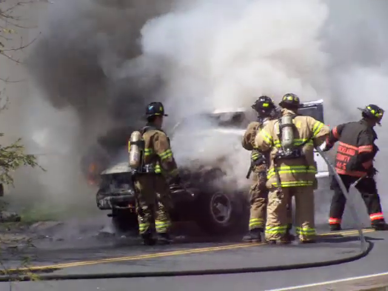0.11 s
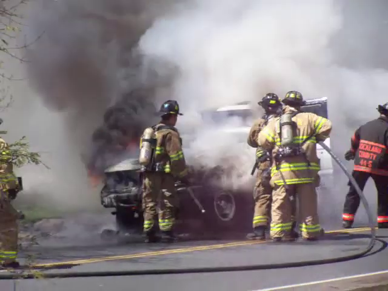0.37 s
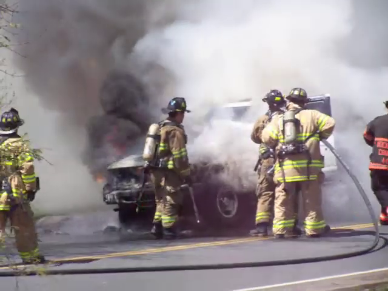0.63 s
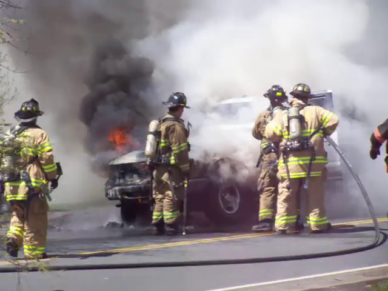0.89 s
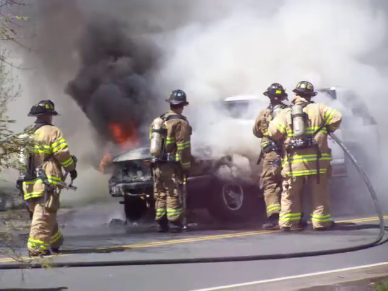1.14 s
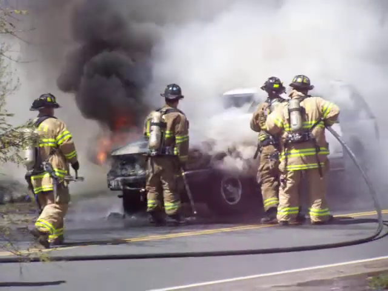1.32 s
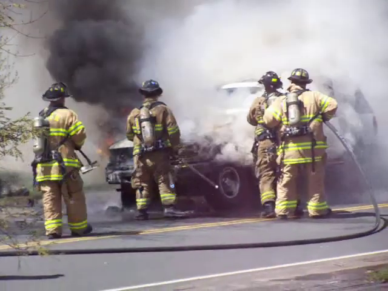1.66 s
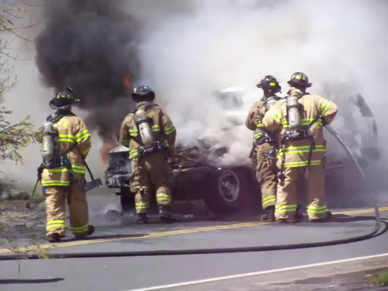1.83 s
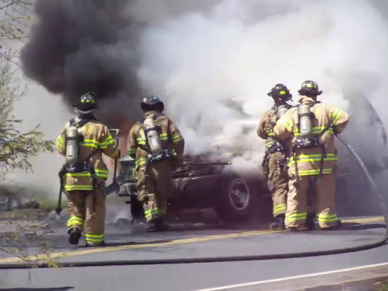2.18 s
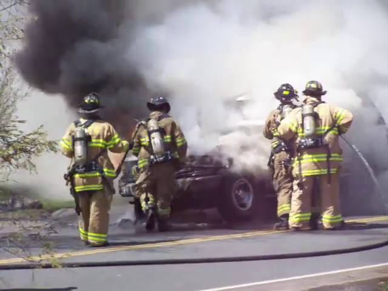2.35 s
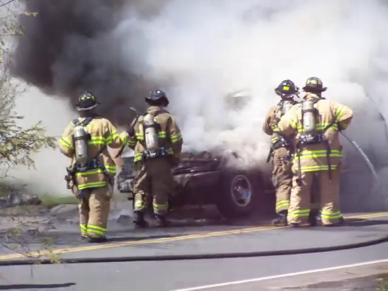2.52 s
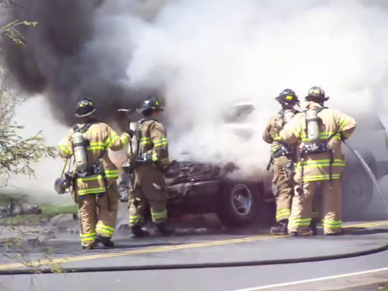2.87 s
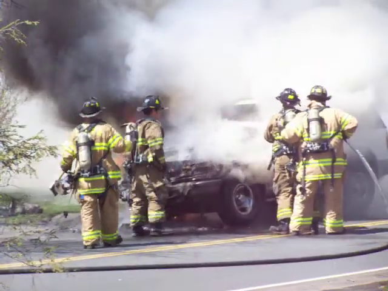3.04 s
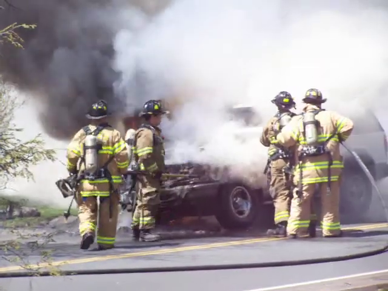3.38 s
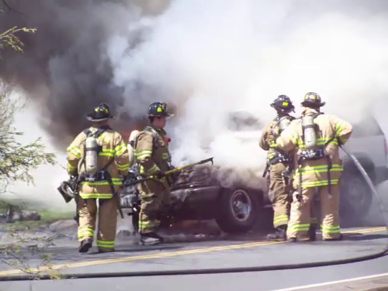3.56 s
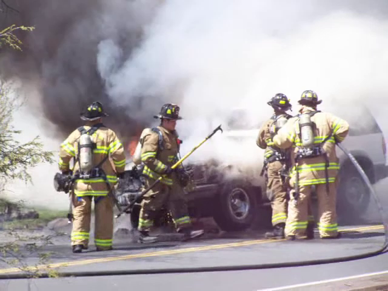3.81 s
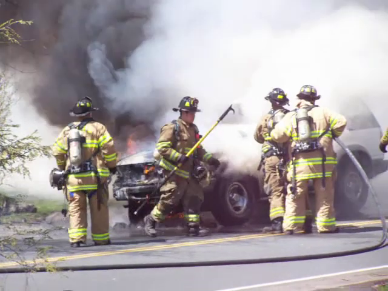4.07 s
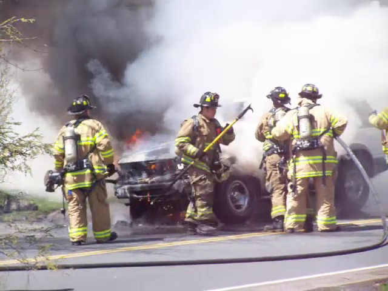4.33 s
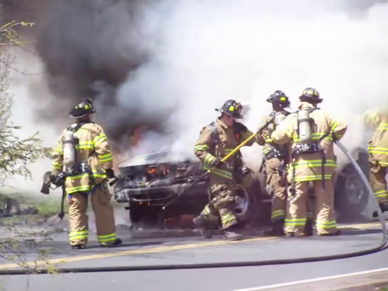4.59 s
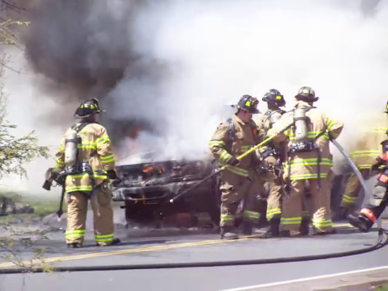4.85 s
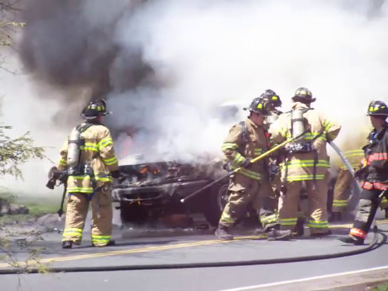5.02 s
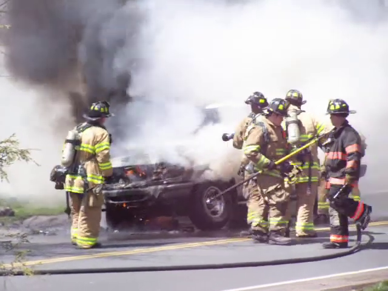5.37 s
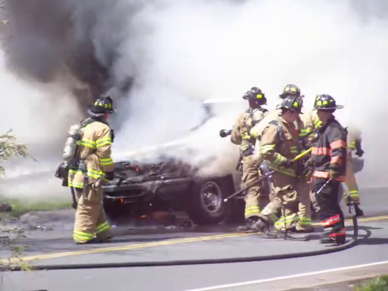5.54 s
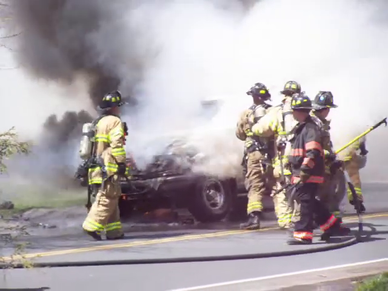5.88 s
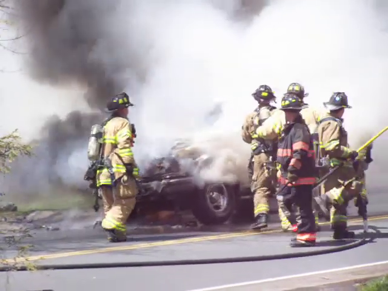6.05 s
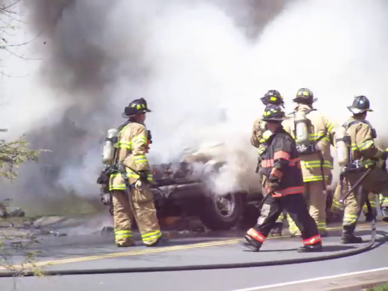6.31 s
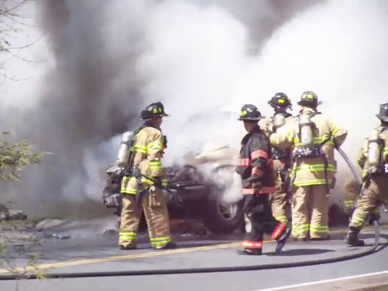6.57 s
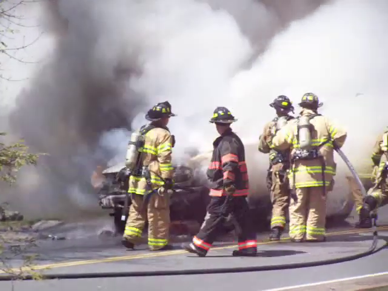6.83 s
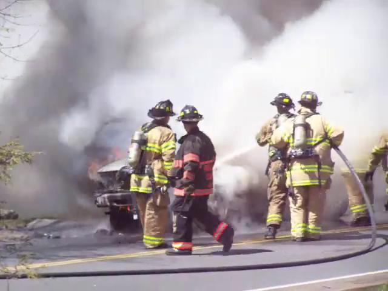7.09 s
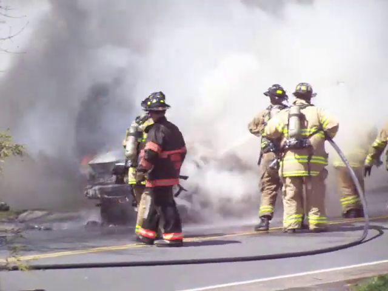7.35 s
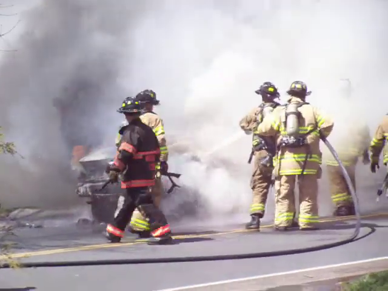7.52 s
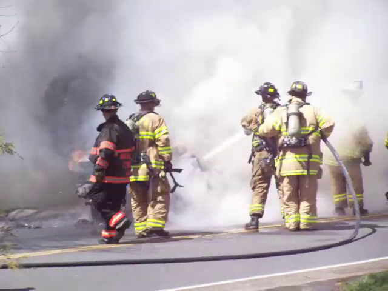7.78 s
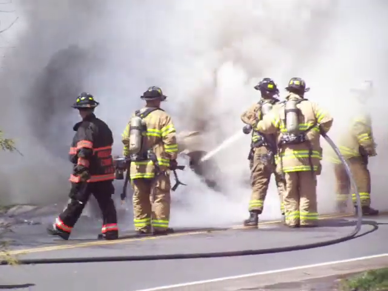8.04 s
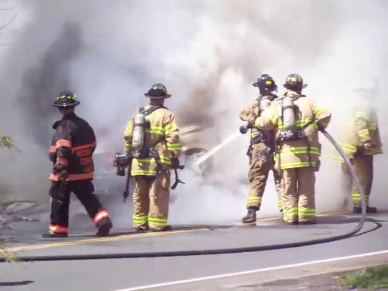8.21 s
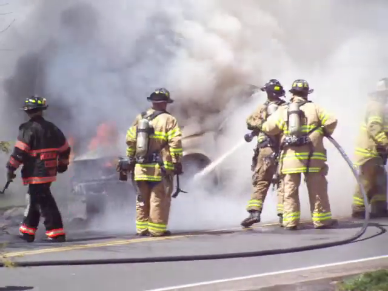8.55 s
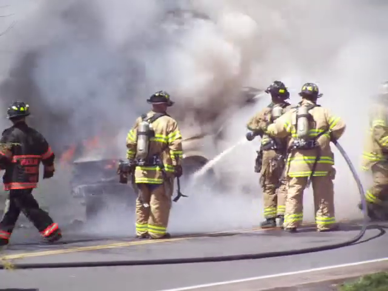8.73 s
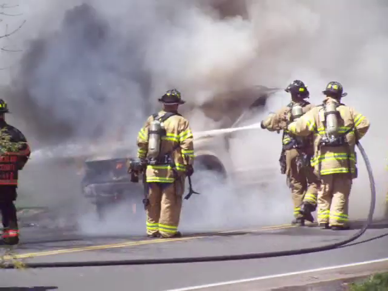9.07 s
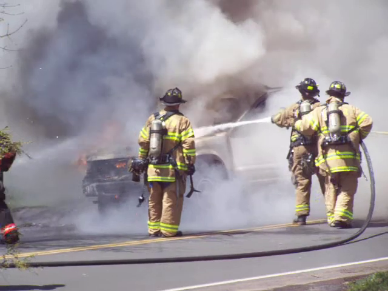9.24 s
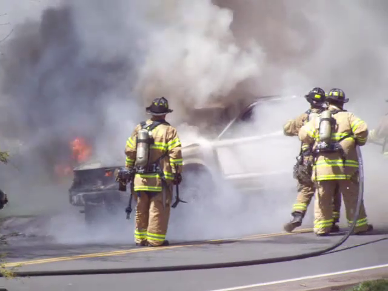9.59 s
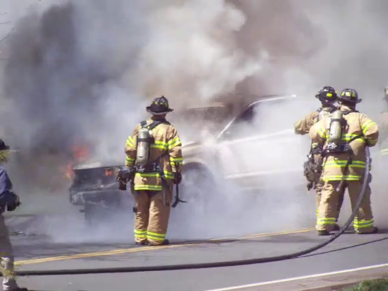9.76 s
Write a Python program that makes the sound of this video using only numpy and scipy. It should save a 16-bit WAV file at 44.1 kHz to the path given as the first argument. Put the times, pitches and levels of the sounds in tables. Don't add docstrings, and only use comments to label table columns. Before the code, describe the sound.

Loud diesel pump drone on a street, tools knocking now and then, and a hose jet bursting into hissing, drumming spray on a burning car.

```python
import sys
import numpy as np
from scipy import signal
from scipy.fft import rfft, irfft
from scipy.io import wavfile

SR = 44100
rng = np.random.default_rng(int(sys.argv[2]) if len(sys.argv) > 2 else 0)


def to_wav(sig):
    pcm = np.clip(np.atleast_2d(sig), -1, 1) * 32767
    pcm = np.round(pcm).astype(np.int16)
    wavfile.write(sys.argv[1], SR, pcm.T)


def rack_gain(trim_db):
    fader = np.asarray(trim_db, float)
    return 10 ** (fader / 20)


N = 436590


def rms_one(x):
    return x / np.sqrt(np.mean(x ** 2) + 1e-20)


def drift(rate_hz):
    r = np.exp(-2 * np.pi * rate_hz * 20 / SR)
    noise = rng.standard_normal(N // 20 + 4002)
    slow = signal.lfilter([1], [1, -2 * r, r * r], noise)[4000:]
    return np.interp(np.arange(N) / 20, np.arange(len(slow)), rms_one(slow))


def coloured(x, spectrum):
    hz, level_db = np.transpose(spectrum)
    log_hz = np.log(np.fft.rfftfreq(N, 1 / SR) + 1)
    shape = rack_gain(np.interp(log_hz, np.log(hz), level_db))
    return rms_one(irfft(rfft(x) * shape, N))


def band(x, low_hz, high_hz):
    return signal.sosfilt(signal.butter(4, [low_hz, high_hz], "band", fs=SR, output="sos"), x)


TAILPIPE, TAILPIPE_LEAD_RAD = (4, 7, 8), 1.95
FAN_END, FAN_END_LEAD_RAD = (6, 9, 10, 13, 17), -2.8


def tones(turn, partials, wobble_db, slip_rad):
    out = 0
    for k, level_db in partials:
        lead = TAILPIPE_LEAD_RAD * (k in TAILPIPE) + FAN_END_LEAD_RAD * (k in FAN_END)
        level = rack_gain(level_db + wobble_db * drift(11.0))
        out = out + level * np.cos(k * turn + lead + slip_rad * drift(1.6))
    return np.sqrt(2) * out


# f/Hz, level/dB per Hz
RUMBLE_SPECTRUM = [(15, -22), (30, -2.5), (60, -13), (100, -15.5), (150, -6), (250, -5.5), (350, 0.5),
                   (420, -10.5), (600, -24), (900, -58)]


def rumble():
    return rack_gain(-34.5) * coloured(rng.standard_normal(N), RUMBLE_SPECTRUM)


# f/Hz, level/dB per Hz
CLATTER_SPECTRUM = [(350, -33), (500, -5.5), (650, -11), (780, -6), (960, -5), (1250, -2.5), (1650, -11),
                    (2180, 0.5), (2580, -7), (2880, -2.5), (3250, -9), (4150, 1.5), (5200, -11),
                    (6200, -24), (9000, -39.5)]
CLATTER_DB, REPEAT_DB = -28.5, -17.5


def clatter(turn):
    throb_db = 0.41 * np.cos(8 * turn) + 0.63 * np.cos(2 * turn) + 0.83 * np.cos(3 * turn + 2.6)
    throb_db = throb_db + 0.29 * drift(23)
    contacts = rng.standard_normal(256)
    turn_part = turn / (2 * np.pi) % 1
    repeated = rms_one(np.interp(turn_part, np.arange(256) / 256, contacts, period=1))
    noise = rack_gain(throb_db) * rng.standard_normal(N) + rack_gain(REPEAT_DB) * repeated
    return rack_gain(CLATTER_DB) * coloured(noise, CLATTER_SPECTRUM)


# multiple of shaft speed, level/dB rms
MESH_WHINE = [(32, -68.5), (36, -47.5), (42, -54), (44, -43), (45, -52.5), (47, -63), (99, -60.5),
              (104, -46)]
# multiple of shaft speed, level/dB rms
PUMP_SHAFT = [(5.849, -37), (8.224, -46), (11.698, -41), (16.448, -46), (19.84, -56)]


def gears(turn):
    mesh = tones(turn, [(3, -44.5)] + MESH_WHINE, wobble_db=0.0, slip_rad=0.55)
    return mesh + tones(turn, PUMP_SHAFT, wobble_db=4.5, slip_rad=0.24)


# t/s, speed/turns per s
SHAFT_SPEED = [(0.0, 21.733), (0.6, 21.713), (1.2, 21.785), (2.4, 21.799), (3.0, 21.777), (6.0, 21.802),
               (7.8, 21.856), (8.4, 21.825), (8.7, 21.668), (9.0, 21.631), (9.3, 21.548), (9.6, 21.546),
               (9.9, 21.437)]
# multiple of shaft speed, level/dB
SHAFT_ORDERS = [(1, -32), (2, -29), (3, -27), (4, -5), (5, -11), (6, -14), (7, -17), (8, -19), (9, 0),
                (10, -14), (11, -7.5), (12, -3), (13, -15), (14, -18), (15, -12), (16, -10), (17, -16),
                (18, -29), (19, -32), (20, -30), (21, -28), (22, -33)]
ORDERS_DB = -20
LOPE_DB, LOPE_LEAD_RAD = 0.95, 1.9


def engine():
    t, turns_per_s = np.transpose(SHAFT_SPEED)
    turn = 2 * np.pi * np.cumsum(np.interp(np.arange(N) / SR, t, turns_per_s)) / SR
    low = tones(turn, SHAFT_ORDERS[3:8], wobble_db=0.6, slip_rad=0.07)
    high = tones(turn, SHAFT_ORDERS[8:], wobble_db=0.6, slip_rad=0.07)
    lope = rack_gain(LOPE_DB * np.cos(turn + LOPE_LEAD_RAD))
    return rack_gain(ORDERS_DB) * (low + lope * high) + gears(turn) + rumble() + clatter(turn)


# start t/s, end t/s, level/dB
PANEL_BUZZES = [
    (1.8, 1.994, -6),
    (3.42, 3.58, -13),
    (3.72, 3.93, -6),
    (5.87, 6.168, -0.5),
]
# multiple of firing rate, level/dB rms
PANEL_PARTIALS = [(5, -32.5), (6, -44), (7, -44)]
FIRING_HZ = 87.1


def buzz():
    t = np.arange(N) / SR
    swell = 0
    for start, end, level_db in PANEL_BUZZES:
        rise = np.clip((t - start) / 0.098, 0, 1)
        fall = np.clip((end - t) / 0.036, 0, 1)
        swell = swell + rack_gain(level_db) * rise * fall
    return swell * tones(2 * np.pi * FIRING_HZ * t, PANEL_PARTIALS, wobble_db=3.0, slip_rad=0.53)


# t/s, peak level/dB, struck part f/Hz, t60/s, hardness/dB
TOOL_KNOCKS = [(.353, -13.5, 1094, 0.065, -1.5), (0.3583, -15.5, 2090, 0.032, -2),
               (0.3618, -8.5, 2320, 0.051, -7.5), (0.3687, -11, 1700, 0.059, -8.5),
               (0.3805, -10, 1190, 0.028, 0.5), (.387, -16.5, 1920, 0.059, -5),
               (3.210, -24, 1200, 0.034, -20), (3.215, -9.5, 700, 0.054, -26),
               (5.447, -21.5, 1510, 0.06, 5.5), (5.455, -20, 1930, 0.033, -1),
               (5.466, -14.5, 1450, 0.05, 3), (5.818, -17.5, 1880, 0.065, 3), (6.137, -12, 2140, .06, 3),
               (6.174, -13.5, 2020, 0.064, 9), (6.198, -15.5, 2120, 0.022, 16),
               (6.254, -3.5, 2060, 0.026, 1.5), (6.329, -16.5, 2200, 0.022, 9.5),
               (7.106, -26, 2150, 0.032, -7), (8.018, -14.5, 2220, 0.023, 12.5),
               (8.278, -29, 2290, 0.061, 0)]
# f/Hz, level/dB, t60/s
MIC_PORTS = [(2150, 5, 0.016), (3750, 3, 0.02), (4860, -4, 0.0067)]


def knocks():
    out, t = np.zeros(N + SR), np.arange(SR // 8) / SR
    contact = 1 - np.exp(-t / 0.0004)
    for s, peak_db, hz, t60_s, hard_db in TOOL_KNOCKS:
        rattle = rng.standard_normal(len(t)) * rack_gain(-60 * t / t60_s)
        part, port_1, port_2, port_3 = [rack_gain(level_db - 60 * t / ring_s) * np.sin(2 * np.pi * f * t)
                                        for f, level_db, ring_s in [(hz, 0, 0.012)] + MIC_PORTS]
        low = part + min(hz / 1300, 1) ** 2 * port_1
        low = low + 2 * band(rattle, hz * 0.75, min(hz * 2.0, 2700))
        high = port_2 + port_3 + 2 * band(rattle, 3500, 5160)
        start = round(s * SR)
        out[start:start + len(t)] += rack_gain(peak_db - 4) * contact * (low + rack_gain(hard_db) * high)
    return band(out[:N], 590, 11000)


JET_ON_S, JET_OFF_S = 0.016, 0.035
OVERSPRAY_DB = -47


def bursts(rows):
    t = np.arange(N // 20 + 2) * 20 / SR
    power = rack_gain(2 * OVERSPRAY_DB)
    for s, length, from_db, to_db in rows:
        rise = np.clip((t - s) / JET_ON_S, 0, 1)
        fall = np.clip(1 + (s + length - t) / JET_OFF_S, 0, 1)
        slide_db = np.interp(t, [s, s + length], [from_db, to_db])
        power = power + (rise * fall) ** 2 * rack_gain(2 * slide_db)
    return np.interp(np.arange(N) / SR, t, power)


# f/Hz, level/dB per Hz
SPRAY_SPECTRUM = [(450, -35.5), (900, -18.5), (1650, -22.5), (2150, -9), (2650, -24.5), (2950, -9.5),
                  (3350, -10.5), (3850, 6.5), (4600, -11), (5300, -12), (5700, -26.5), (6300, -30),
                  (6800, -20), (9000, -49.5)]
# low f/Hz, high f/Hz, level/dB under spray, roar, whistle, drumming
STRIKE_BANDS = [(450, 1550, -22, -22.5, -28, -2), (1564, 2650, -14.5, -2, -25, -7),
                (2634, 3360, -13, -12.5, -14, -4), (3170, 4610, -4, -9.5, -3, -11),
                (4330, 6100, -6.5, -8.5, -17.5, -10), (5840, 15100, -23.5, -24, -33.5, -20.5)]
# start t/s, length/s, start level/dB, end level/dB
SPRAY_BURSTS = [(0.0, 0.057, -32, -26), (.15, 0.097, -36, -21.5), (.3, 1.3, -40, -38),
                (1.63, 0.12, -26.5, -23), (2.0, 2.1, -37, -40), (9.1, 0.38, -39, -38.5),
                (1.77, 0.36, -29, -35.5), (2.79, 0.11, -25, -28.5), (4.15, 0.17, -35.5, -31.5),
                (4.6, 1.5, -35, -32), (6.36, .17, -28, -26), (5.81, 0.064, -25, -29),
                (5.94, .08, -32.5, -20), (6.128, .08, -16.5, -16.5), (6.22, .12, -15, -20),
                (7.08, .2, -31.5, -22), (7.3, 0.19, -26.5, -13), (7.46, 0.35, -17, -14),
                (7.78, .34, -15, -17), (8.15, 0.11, -29, -28.5), (8.268, .35, -20, -20),
                (8.625, .32, -21, -22.5), (8.96, 0.12, -26, -27.5), (9.8, .2, -25.5, -25.5)]
# start t/s, length/s, start level/dB, end level/dB
ROAR_BURSTS = [(0.013, 0.028, -23.5, -28), (0.205, 0.076, -30, -28), (.3, 5.1, -42.5, -38.5),
               (9.0, .75, -38.5, -39.5), (1.647, 0.16, -28, -33), (2.776, 0.075, -30, -20.5),
               (4.9, 1.1, -41.5, -39.5), (5.934, 0.13, -29, -35), (6.126, .07, -20.5, -18.5),
               (6.21, .09, -11, -22.5), (6.345, .18, -30.5, -30.5), (7.075, 0.23, -21, -21),
               (7.32, 0.22, -26, -28.5), (7.501, .16, -21.5, -18), (7.672, 0.5, -22.5, -30.5),
               (8.279, .22, -27.5, -22.5), (8.52, .42, -29, -31), (9.796, .2, -26, -21)]
# start t/s, length/s, start level/dB, end level/dB
WHISTLE_BURSTS = [
    (7.297, 0.14, -21, -13.5),
    (7.463, 0.24, -13, -10),
    (7.774, 0.352, -8.5, -13),
    (8.264, .1, -31, -15),
]
# start t/s, length/s, start level/dB, end level/dB
DRUM_BURSTS = [
    (2.79, .08, -34, -33.5),
    (6.18, 0.15, -48, -34),
    (7.087, .3, -33.5, -26),
    (7.5, 0.76, -27, -36),
    (8.303, 0.64, -34, -40),
    (9.833, 0.12, -34.5, -30.5),
]


def jet():
    ways = [bursts(rows) for rows in (SPRAY_BURSTS, ROAR_BURSTS, WHISTLE_BURSTS, DRUM_BURSTS)]
    hits = rng.random(N) < 20000 / SR
    drops = rng.standard_normal(N) * rack_gain(1.2 * rng.exponential(1, N)) * hits
    flutter = rack_gain(0.11 * drift(25) + 0.63 * drift(150))
    spray = coloured(flutter * drops, SPRAY_SPECTRUM)
    out = 0
    for low_hz, high_hz, *weights_db in STRIKE_BANDS:
        power = sum(way * rack_gain(2 * weight_db) for way, weight_db in zip(ways, weights_db))
        level = np.sqrt(power) * rack_gain(0.74 * drift(38))
        out = out + level * rms_one(band(spray, low_hz, high_hz))
    return out


def scene():
    return (engine() + buzz() + knocks() + jet())[None]


KNEE_DB, SQUEEZE, MAKEUP_DB = -17.5, 0.86, 1.64
TREBLE_EAR_DB = 6.5
SENSE_S, RECOVER_DB_PER_S = 0.016, 83


def gain(x):
    heard = x + (rack_gain(TREBLE_EAR_DB) - 1) * band(x, 1000, 8000)
    r = np.exp(-1 / (SENSE_S * SR))
    run_in = np.concatenate([heard[SR // 2:0:-1], heard]) ** 2
    power = signal.lfilter([(1 - r) ** 2], [1, -2 * r, r * r], run_in)[-N:]
    over_db = np.maximum(10 * np.log10(power + 1e-12) - KNEE_DB, 0)
    recovery_db = RECOVER_DB_PER_S * np.arange(N) / SR
    held_db = np.maximum.accumulate(over_db + recovery_db) - recovery_db
    return rack_gain(MAKEUP_DB - SQUEEZE * held_db)


def low_pass(x):
    return signal.sosfilt(signal.butter(12, 8890, fs=SR, output="sos"), x)


def record(dry):
    x = 1.3 * np.tanh(gain(dry[0]) * dry / 1.3)
    ticks = rng.standard_normal(N) * (rng.random(N) < 150 / SR)
    x = x + rack_gain(-77.5) * rms_one(band(ticks, 5100, 11000))
    x = signal.sosfilt(signal.butter(10, 8100, fs=SR, output="sos"), x)
    return low_pass(x)


dry = scene()
out = record(dry)
to_wav(out)
```